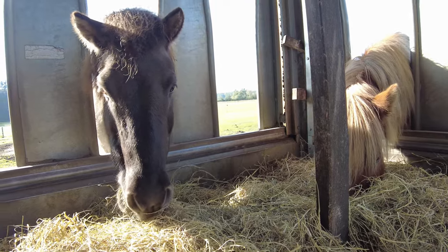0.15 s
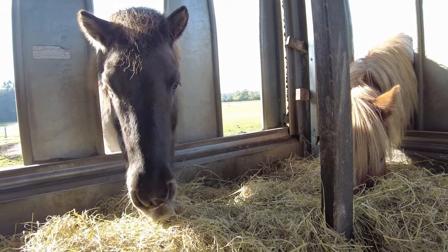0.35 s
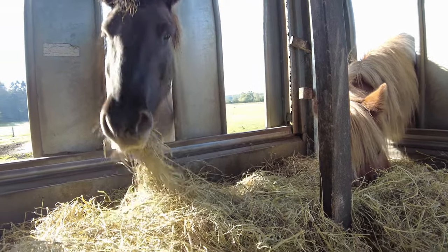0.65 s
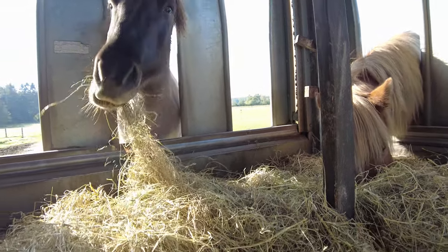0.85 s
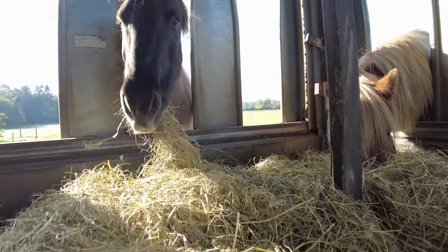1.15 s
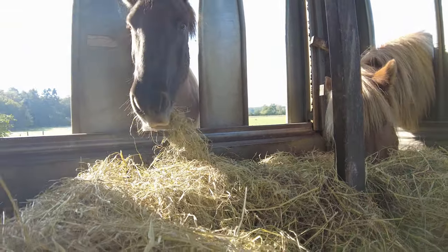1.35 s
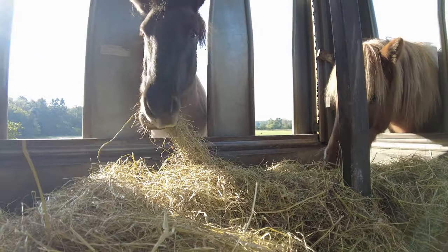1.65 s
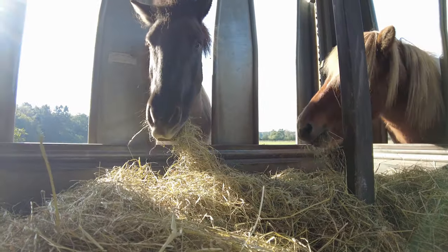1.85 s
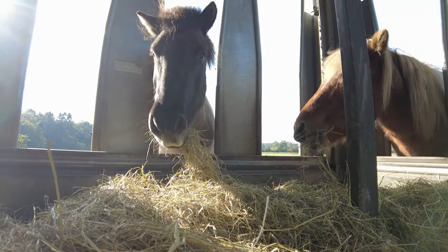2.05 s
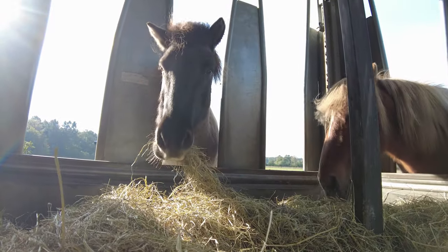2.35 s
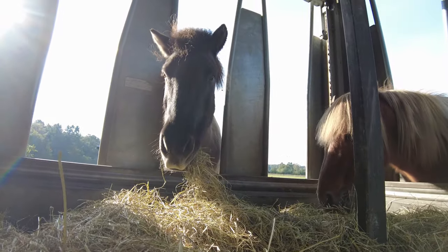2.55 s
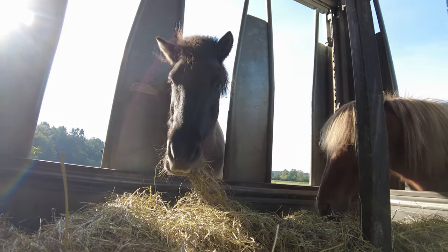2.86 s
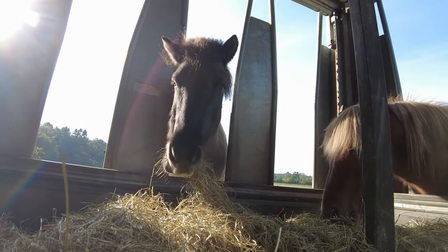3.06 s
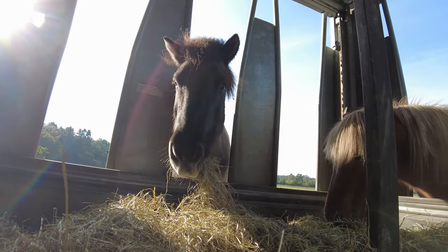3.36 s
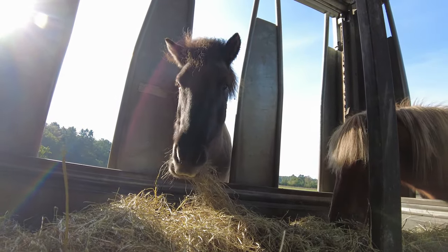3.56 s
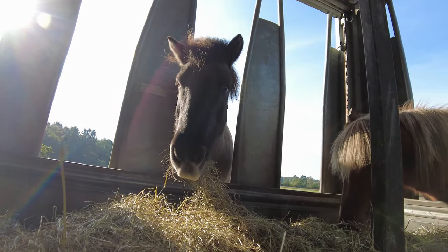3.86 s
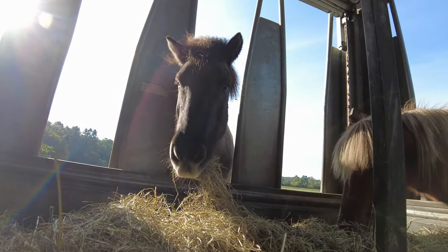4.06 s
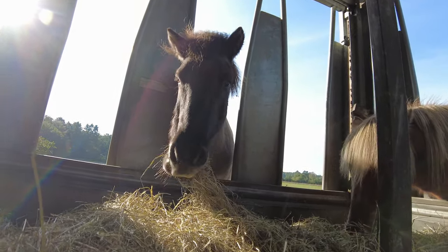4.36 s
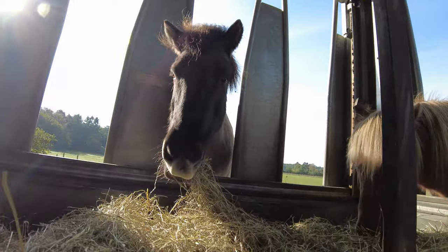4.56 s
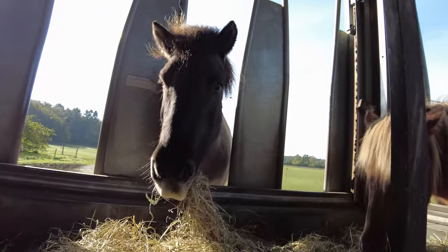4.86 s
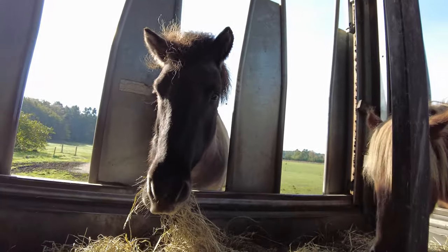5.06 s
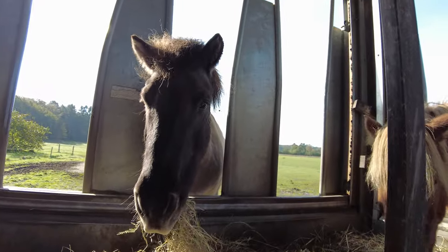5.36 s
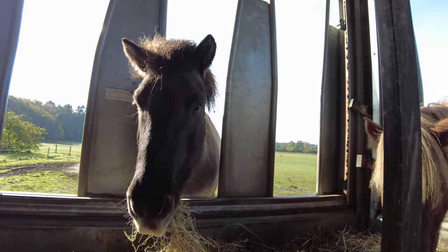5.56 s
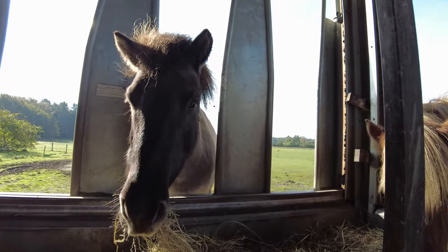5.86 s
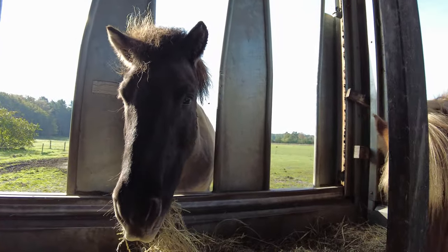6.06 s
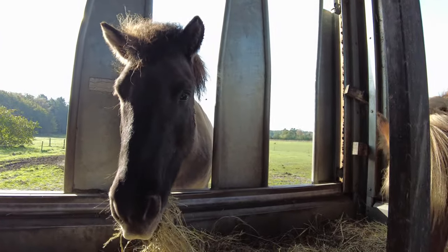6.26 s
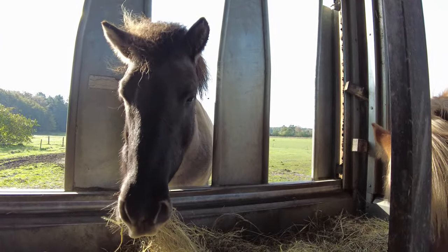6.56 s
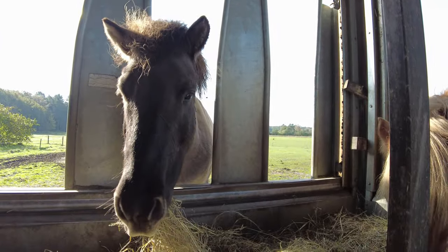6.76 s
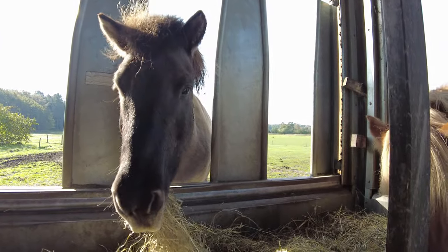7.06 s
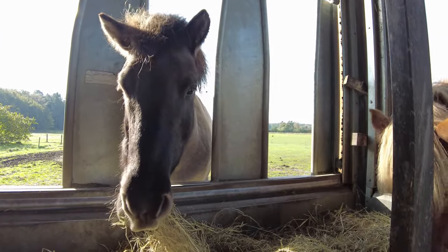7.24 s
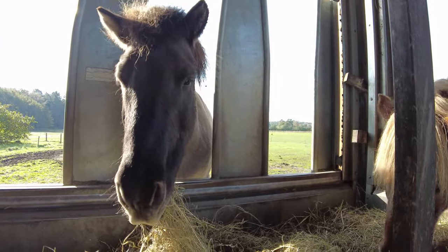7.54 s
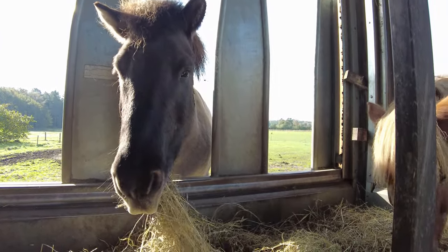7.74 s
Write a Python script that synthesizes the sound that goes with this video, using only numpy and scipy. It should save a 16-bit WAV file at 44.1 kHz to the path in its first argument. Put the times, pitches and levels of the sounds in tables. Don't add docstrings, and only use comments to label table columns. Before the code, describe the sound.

Horses eat dry hay at a feeder in an open field, heard very near in stereo. Heavy jaw strokes give woody, skull-like knocks and gritty grinding, with stalks snapping and small dry ticks on top. Tugged hay rustles most at the start and again late. Faint nose wheezes and low rumbling wind sit underneath. Two thumps stand out, one past halfway and a louder one just before the end.

```python
import sys
import numpy as np
from scipy import signal
from scipy.io import wavfile
from scipy.ndimage import uniform_filter1d

SR = 44100
rng = np.random.default_rng(int(sys.argv[2]) if len(sys.argv) > 2 else 0)


def gain_from_decibels(decibels):
    exponent = np.asarray(decibels, float) / 20
    return 10 ** exponent


def transcribe(signal):
    frames = np.atleast_2d(signal).T
    limited = np.clip(frames, -1, 1)
    pcm = np.round(limited * 32767).astype(np.int16)
    wavfile.write(sys.argv[1], SR, pcm)


N = 348390

# start t/s, length/s, grinding level/dB, crushing level/dB, dry fibre level/dB
CHEW_STROKES = [(.22, 0.31, -34, -46.5, -56), (.93, 0.3, -40.5, -50.5, -59.5),
                (1.63, 0.44, -30.5, -51.5, -75), (2.33, 0.33, -30, -50.5, -63),
                (3.05, 0.29, -30.5, -50, -70), (3.72, 0.28, -30.5, -47.5, -63),
                (4.4, 0.34, -35, -51.5, -68), (5.15, 0.3, -36, -50, -69), (5.86, 0.27, -34, -49, -61),
                (6.63, 0.35, -36.5, -52, -60.5), (7.35, 0.27, -35, -48.5, -63)]
# t/s, peak level/dB, f/Hz
TOOTH_CLACKS = [(0.326, -43, 410), (1.057, -34.5, 410), (1.206, -41, 353), (1.371, -29.5, 408),
                (1.475, -34, 400), (1.633, -32.5, 419), (1.834, -42, 360), (2.087, -32.5, 404),
                (2.488, -33.5, 432), (2.754, -40, 428), (3.497, -31, 413), (3.944, -38, 385),
                (4.212, -34.5, 408), (4.948, -40.5, 538), (6.514, -37, 419), (7.476, -30.5, 420)]
# t/s, level/dB
STEM_CRACKS = [(0.3187, -37), (0.3433, -31), (2.088, -36), (2.3765, -37), (2.5312, -34), (3.4865, -36),
               (4.4332, -40), (4.5190, -44), (4.9509, -19.5), (5.279, -45), (5.327, -27), (5.3815, -32),
               (6.7377, -41), (7.093, -33.5), (7.4293, -39), (7.7398, -45), (7.843, -31.5)]
REST_CRUSH_DB = -58.5


def evened(x):
    return x / np.sqrt(np.mean(x ** 2) + 1e-20)


def read(points, hz):
    f, value = np.transpose(points)
    return np.interp(np.log(hz + 1), np.log(f + 1), value)


def control(table, column):
    rows = np.array(table)
    row_numbers = np.arange(len(rows))
    place = np.interp(np.arange(N) / SR, rows[:, 0], row_numbers)
    eased = place - .1 * np.sin(2 * np.pi * place)
    return gain_from_decibels(np.interp(eased, row_numbers, rows[:, column]))


def add(mix, start_s, sound):
    start = round(start_s * SR)
    sound = sound[max(-start, 0):]
    part = mix[max(start, 0):][:len(sound)]
    part += sound[:len(part)]


def coloured(x, points, size=8192):
    level_db = np.maximum(read(points, abs(np.fft.fftfreq(size, 1 / SR))), -90)
    log_gain = np.log(gain_from_decibels(level_db))
    taps = np.fft.ifft(np.exp(np.conj(signal.hilbert(log_gain)))).real[:size // 2]
    return signal.oaconvolve(x, taps)[:N]


def resonate(x, hz, width_hz):
    turn = np.exp(2j * np.pi * np.cumsum(hz * np.ones(len(x))) / SR)
    r = np.exp(-np.pi * width_hz / SR)
    return 2 * (turn * signal.lfilter([1 - r], [1, -r], x / turn)).real


def lumps(hz, depth_db):
    lowpass = signal.butter(2, hz, fs=SR, output="sos")
    return gain_from_decibels(depth_db * evened(signal.sosfilt(lowpass, rng.standard_normal(N))))


def clicks(per_s, spread_db):
    chance = rng.random(N)
    sign = rng.choice([-1., 1.], N)
    size = np.minimum(rng.exponential(1, N), 4)
    return (chance < per_s / SR) * sign * gain_from_decibels(spread_db * size)


def ring(hz, t60_s, rise_s):
    t = np.arange(0, .15, 1 / SR)
    shape = (1 - np.exp(-t / rise_s)) ** 2 * gain_from_decibels(-60 * t / max(t60_s, .004))
    return shape / shape.max() * np.sin(2 * np.pi * hz * t)


def drifting(x, bins, frames, change, size):
    overlap = size * 3 // 4
    z = signal.stft(x, nperseg=size, noverlap=overlap)[2]
    field = rng.standard_normal(z.shape[::-1] + (2,)).T
    a, b = (evened(uniform_filter1d(uniform_filter1d(f, bins, axis=0), frames, axis=1)) for f in field)
    return signal.istft(z * change(a + 1j * b), nperseg=size, noverlap=overlap)[1][:N]


def strokes(table, column, roundness=1, skew=0.85):
    power = np.zeros(N)
    for row in table:
        start_s, length_s = row[:2]
        u = np.arange(0, 1, 1 / (SR * length_s))
        add(power, start_s, gain_from_decibels(2 * row[column]) * np.sin(np.pi * u ** skew) ** (2 * roundness))
    return power


def jaws(column, rest_db):
    # start t/s, length/s, grinding level/dB, crushing level/dB
    nibble_strokes = [(-.05, 0.096, -41.5, -51), (.12, 0.15, -44.5, -51.5), (.54, 0.094, -39, -56),
                      (.64, 0.49, -44, -73), (1.19, 0.25, -44, -51.5), (1.34, 0.23, -38, -53.5),
                      (2.04, 0.2, -38, -60), (2.7, 0.19, -35, -58), (3.42, 0.26, -37, -60.5),
                      (4.01, 0.091, -40, -58.5), (4.15, 0.2, -35.5, -57), (4.73, 0.25, -45, -61),
                      (4.86, 0.2, -39.5, -49.5), (5.5, 0.25, -39, -50.5), (6.18, 0.11, -40.5, -51),
                      (6.38, 0.49, -47, -57.5), (6.9, 0.2, -43, -56.5), (7.05, 0.15, -43.5, -53),
                      (7.16, 0.2, -39.5, -55.5), (7.59, 0.13, -40, -56), (7.79, 0.089, -44, -48)]
    return np.sqrt(strokes(CHEW_STROKES, column) + strokes(nibble_strokes, column) + gain_from_decibels(2 * rest_db))


def molars():
    # f/Hz, width/Hz, level/dB
    skull_modes = [(215.5, 47, -2), (238, 52.7, 1.5), (265, 125, -4), (283.4, 42.7, 2.5), (352.4, 4.5, -25),
                   (420, 29, -15.5)]
    # t/s, factor on skull pitch [1]
    jaw_tilt = [
        (0, 0.96),
        (1.1, 0.99),
        (1.85, 1.05),
        (3.1, 1.02),
        (4.4, 1.003),
    ]
    # centre t/s, peak level/dB, skull f/Hz, length/ms
    knocks = [(0.329, -15.5, 238, 15.8), (0.347, -15.5, 235, 15), (0.381, -16, 273.5, 21.4),
              (0.428, -17, 271, 8.9), (1.064, -24.5, 261, 22.8), (1.13, -15.5, 250, 24.6),
              (1.717, -23.5, 260, 18), (7.288, -26, 263, 22), (1.826, -17.5, 276, 12.8),
              (1.95, -18.5, 265, 17.8), (2.446, -15.5, 268, 15.4), (2.495, -12.5, 266, 7.9),
              (2.56, -21.5, 285, 18), (3.153, -17, 249, 15.4), (3.197, -17, 283, 12.2),
              (3.847, -19.5, 255, 4.8), (3.893, -13.5, 275, 10.9), (3.946, -17, 250, 8.9),
              (4.45, -22.5, 243, 26), (4.625, -13, 252, 10.7), (4.642, -10.5, 244, 14.9),
              (5.297, -18, 243, 19.9), (5.336, -18.5, 238, 13.3), (5.934, -17.5, 245, 14.1),
              (6.029, -15.5, 245, 14.3), (6.785, -22, 245, 14), (7.439, -19, 255, 13.4),
              (7.493, -15.5, 248, 11), (7.528, -8.5, 237, 15.8), (7.552, -15.5, 231, 11.4)]
    # centre t/s, peak level/dB, skull f/Hz
    soft_slips = [(0.21, -23, 262), (0.574, -31.5, 239), (0.816, -25, 275), (1.23, -24, 231),
                  (1.367, -29, 307), (1.49, -21.5, 288), (1.909, -20.5, 267), (2.103, -25.5, 311),
                  (2.396, -35, 265), (2.746, -28, 238), (2.77, -33, 285), (2.835, -33, 275),
                  (3.253, -20, 268), (3.522, -32, 258), (3.604, -25.5, 218), (3.778, -24, 220),
                  (4.059, -32, 255), (4.227, -22.5, 229), (4.528, -24.5, 232), (4.663, -16.5, 242),
                  (4.931, -19.5, 272), (5.014, -25, 220), (5.598, -26, 249), (5.666, -26, 301),
                  (6.083, -21.5, 225), (6.593, -25.5, 283), (6.695, -22, 250), (6.97, -30, 231),
                  (7.218, -28.5, 251.6), (0.193, -30.5, 268)]
    # t/s, peak level/dB, f/Hz
    thuds = [(0.373, -37, 148), (0.417, -36, 135), (2.541, -30, 112), (3.23, -34, 95), (3.813, -36, 146),
             (3.879, -31, 80), (4.21, -31.5, 92), (6.26, -36, 116), (7.29, -37, 131), (4.629, -23, 129),
             (4.942, -39.5, 104), (5.319, -30.5, 131), (5.903, -33, 133), (6.072, -29, 115),
             (6.783, -33, 105), (6.839, -27, 118), (7.516, -25.5, 107)]

    tilt = np.interp(np.arange(N) / SR, *np.transpose(jaw_tilt))
    skull = 0
    for hz, width_hz, db in skull_modes:
        mode = resonate(clicks(200, spread_db=2.5), hz * tilt, width_hz)
        skull = skull + gain_from_decibels(db) * evened(resonate(mode, hz * tilt, 1.55 * width_hz))
    grinding = gain_from_decibels(-1.5) * jaws(column=2, rest_db=-46) * evened(skull * lumps(52, depth_db=1.0))

    out = np.zeros(N)
    catches = knocks + [row + (14,) for row in soft_slips]
    for (s, db, hz, length_ms), phase in zip(catches, rng.random((len(catches), 1))):
        u = np.arange(0, 4, 1000 / (SR * length_ms))
        swell = (u / 0.66 * np.exp(1 - u / 0.52)) ** 1.66
        tone = np.sin(2 * np.pi * (hz * u * length_ms / 1000 + phase))
        add(out, s - 0.00059 * length_ms, gain_from_decibels(db) * swell * tone)
    catch_power = abs(uniform_filter1d(out ** 2, size=400)) / gain_from_decibels(2 * -30.0)
    out = out + grinding / np.sqrt(1 + catch_power)
    for s, db, hz in thuds:
        add(out, s, gain_from_decibels(db - 5.5) * ring(hz, 0.11, rise_s=0.0044))
    for s, db, hz in TOOTH_CLACKS:
        add(out, s, gain_from_decibels(db - 2.0) * ring(hz, 0.09, rise_s=0.00091))
    return out


def crushing(teeth):
    # f/Hz, level/dB per Hz
    mouth = [(260, -16), (450, 0), (550, -5), (608, -2.5), (771, -3), (908, -5), (1000, -7.5),
             (1100, -13.5), (1260, -8.5), (1680, -12), (2630, -16), (3700, -23.5), (4300, -19),
             (9000, -33.5), (11700, -74), (19800, -120)]
    # t/s, peak level/dB, low ring f/Hz, high ring f/Hz, high ring level/dB
    snaps = [(0.319, -34.5, 740, 2200, -7), (0.374, -39, 638, 2360, -42), (0.399, -32.5, 624, 2000, -32),
             (1.021, -56.5, 620, 3050, 15.5), (2.087, -32, 492, 2570, -23), (2.376, -35, 490, 2150, -21),
             (2.491, -36.5, 770, 2330, -27), (2.53, -42, 610, 2200, -16), (3.185, -32.5, 509, 2460, -11.5),
             (4.201, -43, 1460, 1760, -4), (4.518, -51, 1380, 2600, -9), (4.623, -35, 467, 2600, -8.5),
             (5.213, -42.5, 1450, 1800, -25), (5.327, -31.5, 635, 2580, -15), (5.38, -39, 705, 1810, -18),
             (5.985, -44, 1255, 2470, -10), (6.578, -47, 1265, 2570, -24), (6.737, -41, 730, 2610, -10.5),
             (7.198, -39, 700, 2450, -13), (7.43, -44, 740, 2410, -21), (7.476, -35.5, 650, 3100, -11),
             (7.739, -51, 1472, 1880, 5), (7.828, -45, 1237, 1880, -18)]
    # t/s, level/dB
    cheek = [
        (0, 1.5),
        (2, -4.5),
        (4.2, -26),
        (5.2, 5),
        (7.9, 6),
    ]

    press = jaws(column=3, rest_db=REST_CRUSH_DB)
    cracks = press * clicks(5000, spread_db=3.0) * lumps(105, depth_db=0.6)
    power = teeth ** 2 + 1e-9
    catching = uniform_filter1d(power, size=500) / uniform_filter1d(power, size=4000)
    cracks = cracks * catching ** 0.19
    press_rms = np.sqrt(np.mean(press ** 2))
    clumps = drifting(coloured(cracks, mouth), bins=4, frames=9,
                      change=lambda f: gain_from_decibels(2.34 * f.real), size=256)
    out = gain_from_decibels(-2.0) * press_rms * hush() * evened(clumps)

    blows = np.zeros(N)
    t = np.arange(0, .04, 1 / SR)
    for (s, db, low_hz, high_hz, high_db), grit in zip(snaps, rng.standard_normal((len(snaps), len(t)))):
        splinters = grit * gain_from_decibels(-60 * t / 0.12) * (1 - np.exp(-t / 0.00025))
        add(blows, s, gain_from_decibels(db) * splinters)
        add(out, s, gain_from_decibels(db + high_db + 15.5) * resonate(splinters, high_hz, 210))
        add(out, s, gain_from_decibels(db - 5.5) * ring(low_hz, 0.12, rise_s=0.00008))
    for (s, db, _), grit in zip(TOOTH_CLACKS, rng.standard_normal((len(TOOTH_CLACKS), len(t)))):
        add(blows, s - .012, gain_from_decibels(db - 9.5) * grit * np.hanning(len(t)))
    u = t * 1000 / 0.84
    crack = -np.sin(np.pi * u) * np.exp(-.55 * u) * np.clip(3.2 * u, 0, 1)
    for s, db in STEM_CRACKS:
        add(out, s, gain_from_decibels(db) * crack)
    out = out + gain_from_decibels(5.5) * coloured(blows, mouth)
    return out + control(cheek, column=1) * resonate(out, 1330, 250)


def hush():
    hush_s, depth = 0.0055, 0.48
    gain = np.ones(N)
    dip = depth * np.sin(np.pi / 2 * np.arange(0, 1, 1 / (SR * hush_s)))
    for s, _ in STEM_CRACKS:
        add(gain, s - hush_s, -dip)
    return gain


def fibres():
    # t/s, peak level/dB, ring f/Hz
    ticks = [(0.32, -40, 2300), (0.3985, -47, 2900), (0.4204, -34, 2110), (0.9527, -33, 1920),
             (1.0216, -47, 3120), (2.3765, -39, 2220), (2.4307, -29.5, 2450), (2.4775, -34, 2400),
             (2.8125, -33, 2020), (3.1457, -31, 2340), (3.1911, -46, 2730), (3.8263, -32, 2680),
             (3.8851, -29.5, 2370), (4.5191, -44, 1950), (4.5637, -32, 1920), (4.6229, -39, 2900),
             (4.8638, -34, 1810), (4.949, -32, 1700), (5.3078, -28.5, 1920), (5.327, -32.5, 2800),
             (5.9135, -36, 1720), (5.9843, -25.5, 2470), (6.7835, -34, 1870), (7.492, -45, 1830),
             (7.6235, -32, 1860), (7.7403, -39, 2160)]
    # t/s, peak level/dB, ring f/Hz
    stems = [
        (2.24, -50, 9000),
        (6.72, -48, 12500),
        (2.239, -44.5, 5950),
        (2.31, -54, 7000),
        (2.76, -50, 6200),
        (3.2, -53, 5800),
        (3.345, -53, 10700),
        (4.809, -43, 6000),
        (6.695, -44, 10000),
    ]
    # t/s, peak level/dB, ring f/Hz
    threads = [(0.2713, -37, 2680), (0.3504, -45, 2650), (0.44, -37, 2660), (1.0336, -36, 3030),
               (1.0809, -45, 1980), (1.72, -35, 2880), (1.8986, -36, 2150), (2.5316, -47, 2210),
               (3.248, -42, 2160), (3.788, -41, 2700), (3.807, -32, 2260), (3.834, -28, 2300),
               (4.637, -35, 2590), (4.912, -40, 2440), (4.9831, -33, 2020), (5.9845, -39, 3200),
               (6.6856, -43, 3150), (6.9272, -34, 2400), (7.2779, -33, 2350), (7.443, -37, 2730)]

    fibre_hz, width_hz = 2600, 860
    tearing = clicks(1500, spread_db=5.5) * lumps(64, depth_db=2.5)
    tearing = resonate(tearing, fibre_hz, width_hz)
    tearing = resonate(tearing, fibre_hz, 1.1 * width_hz)
    pull = np.sqrt(strokes(CHEW_STROKES, column=4, roundness=1.8, skew=0.74))
    out = pull * hush() * evened(tearing)
    t = np.arange(0, .03, 1 / SR)
    parting = ticks + stems + threads
    for (s, db, hz), grit in zip(parting, rng.standard_normal((len(parting), len(t)))):
        burst = grit * gain_from_decibels(-60 * t / 0.024) * np.tanh(t / .0015)
        burst = resonate(resonate(burst, hz, 800), hz, 1400)
        add(out, s, gain_from_decibels(db - 8.5) * burst / abs(burst).max())
    return out


def crackle():
    # t/s, peak level/dB, f/Hz
    pips = [(0.082, -49, 1280), (0.2906, -39, 1420), (0.3287, -36.5, 1440), (0.3434, -44, 1280),
            (0.3504, -42, 1280), (0.4414, -41, 1400), (1.079, -42, 1420), (1.1213, -46, 1300),
            (1.2257, -48, 1390), (1.365, -40.5, 1350), (1.432, -46.5, 1530), (1.6305, -46, 1380),
            (1.694, -41.5, 1440), (4.1395, -49, 1400), (4.2168, -43.5, 1467), (4.5188, -49, 1340),
            (4.6224, -43, 1320), (4.637, -40, 1280), (4.6504, -40, 1120), (4.891, -48, 1510),
            (4.9167, -41.5, 1460), (4.9512, -42, 1340), (5.2769, -43.5, 1430), (5.307, -43, 1300),
            (4.937, -39, 1530), (5.966, -51, 1250), (5.9825, -35, 1294), (6.0236, -50, 1266),
            (5.38, -45, 1340), (6.7745, -42, 1343), (7.0932, -41, 1310), (7.1127, -48, 1280),
            (7.1374, -43, 1330), (7.198, -41, 1480), (7.4899, -41, 1305), (7.518, -39, 1270),
            (7.7388, -40, 1290), (7.811, -44, 1430)]
    # t/s, peak level/dB, f/Hz
    pops = [(0.292, -48, 710), (0.333, -38, 677), (2.416, -43, 533), (2.799, -46.5, 850), (3.099, -47, 804),
            (3.246, -44, 773), (3.486, -48, 550), (3.766, -50, 616), (3.812, -39.5, 528),
            (4.433, -44.5, 656), (4.932, -44, 633), (5.283, -42, 689), (5.356, -39, 700), (5.914, -41, 646),
            (5.971, -39, 633), (5.983, -38, 640), (6.501, -48, 770), (6.686, -47.5, 580), (6.917, -47, 726),
            (7.43, -47, 645), (7.448, -47, 790), (7.62, -46, 790)]
    # t/s, peak level/dB, skull f/Hz
    small_catches = [(0.254, -32.5, 266), (0.296, -31, 260), (0.403, -26, 274), (0.775, -33, 282),
                     (0.953, -29, 259.4), (1.034, -25, 269.3), (1.083, -23, 255.5), (1.627, -41, 280),
                     (1.693, -32, 304), (1.768, -28, 283.4), (1.978, -36, 247), (2.368, -33.5, 275),
                     (2.477, -23.5, 257.6), (2.529, -33, 301), (2.659, -35.5, 250), (3.829, -35, 238),
                     (4.55, -27, 237), (4.59, -29.5, 269), (4.758, -33, 288.5), (4.826, -33, 235),
                     (4.984, -29, 279), (5.23, -27, 235.4), (5.378, -33, 227), (5.536, -38, 261.1),
                     (6.289, -33.5, 270.4), (6.328, -34, 282), (6.749, -30.5, 218), (7.619, -30.5, 238)]

    out = np.zeros(N)
    kinds = ((pips, -.5, .03, .002), (pops, -1.0, .075, .003), (small_catches, -1.5, .13, .005))
    for table, shift_db, t60_s, rise_s in kinds:
        grits = uniform_filter1d(rng.standard_normal((len(table), 6615)), size=12, axis=1)
        for (s, db, hz), grit in zip(table, grits):
            rough = 1 + 0.98 * hz / 1000 * grit
            add(out, s, gain_from_decibels(db + shift_db) * ring(hz, t60_s, rise_s) * rough)
    splinters = resonate(resonate(clicks(700, spread_db=2.5), 1450, 1800), 1900, 2600)
    press = jaws(column=3, rest_db=REST_CRUSH_DB - 5.0)
    out = out + gain_from_decibels(-10.5) * press * hush() * evened(splinters)
    return signal.sosfilt(signal.butter(2, 5500, fs=SR, output="sos"), out)


def rustle():
    # t/s, rustle level/dB
    heap = [(.3, -68), (.53, -60.5), (.74, -58), (.98, -65.5), (1.34, -67), (1.62, -58), (2.2, -68.5),
            (3.1, -71.5), (3.72, -74), (4.07, -67), (4.39, -70.5), (5.72, -67.5), (6.1, -67), (6.53, -62.5),
            (6.95, -66.5), (7.22, -64), (7.78, -62), (7.9, -66)]
    # start t/s, length/s, rustle level/dB
    tugs = [(.55, 0.45, -56), (1.03, 0.29, -59.5), (1.5, 0.4, -70), (3.05, 0.27, -64), (3.3, 0.11, -65),
            (3.5, 0.16, -64), (3.78, .17, -65), (4.0, 0.13, -65.5), (4.5, 0.25, -62), (4.98, 0.19, -63.5),
            (5.55, 0.3, -66), (5.88, .1, -66), (7.12, 0.31, -59.5)]
    # f/Hz, level/dB per Hz
    hay = [(590, -22), (1000, -7), (1370, -8.5), (1680, -1), (1980, -9), (3170, -6), (7800, -11.5),
           (13300, -18), (15800, -20.5)]

    stems = clicks(9000, spread_db=-1.5) * lumps(24, depth_db=0.6)
    shake = np.tanh(jaws(column=3, rest_db=REST_CRUSH_DB) / gain_from_decibels(REST_CRUSH_DB + 10.0)) ** 0.081
    stirred = gain_from_decibels(5.0) * control(heap, column=1) * shake
    pulled = np.sqrt(stirred ** 2 + strokes(tugs, column=2, roundness=0.97))
    return pulled * evened(coloured(stems, hay))


def nostrils():
    wheezes = [(1.99, 2.09, 4900, 3600, -63.5), (2.95, 3.07, 2960, 3700, -65), (4.87, 5.0, 3400, 3600, -62),
               (7.35, 7.46, 4300, 2860, -60), (1.19, 1.33, 1700, 1650, -54.5), (0.98, 1.4, 2700, 3100, -60),
               (5.76, 5.96, 3570, 3900, -62), (5.76, 5.92, 2800, 3100, -61.5),
               (2.8, 2.85, 1400, 1500, -56.5), (.575, .605, 1200, 870, -49.5),
               (1.015, 1.05, 2800, 2900, -61)]
    out = np.zeros(N)
    for start_s, end_s, from_hz, to_hz, db in wheezes:
        hz = np.linspace(from_hz, to_hz, round((end_s - start_s) * SR))
        breath = rng.standard_normal(SR)[:len(hz)]
        breath = resonate(resonate(breath, hz, 520), hz, 710)
        add(out, start_s, gain_from_decibels(db) * evened(breath) * signal.windows.tukey(len(hz), .6))
    return out


def outdoors():
    # t/s, level/dB
    gusts = [(0.0, -46), (0.09, -48.5), (0.59, -40), (0.72, -47), (1.21, -43), (1.63, -44), (1.65, -50),
             (1.82, -41), (2.07, -49), (3.8, -45.5), (4.6, -48.5), (4.64, -36), (4.69, -48.5), (6.8, -49),
             (6.86, -47), (7.41, -53), (7.55, -49), (7.9, -55)]
    # f/Hz, level/dB per Hz
    wind_spectrum = [(12, -45), (20, 9), (49, 12), (96, -0.5), (124, -3.5), (156, -7.5), (175, -28),
                     (230, -8.5), (390, -120)]
    # f/Hz, level/dB per Hz
    air_spectrum = [(59, -2.5), (100, -11), (156, -30.5), (219, -2), (265, -1.5), (511, -17.5), (796, -22),
                    (1090, -43), (1300, -21.5), (2250, -34), (3150, -27.5), (12800, -53), (15800, -51)]
    wind = control(gusts, column=1) * evened(coloured(rng.standard_normal(N), wind_spectrum))
    air = evened(coloured(rng.standard_normal(N), air_spectrum))
    return gain_from_decibels(0.5) * wind + gain_from_decibels(-51.5) * air


def panels(x):
    # f/Hz, side over mid level/dB
    side_width = [(60, -18), (150, -19.5), (250, -8), (400, -3.5), (700, -0.5), (1000, 6.5), (1300, -5.5),
                  (2400, -1.5), (4400, 0.5), (6000, -2.5), (7800, -2), (9500, -2), (15000, -1.5)]
    width = gain_from_decibels(read(side_width, np.fft.rfftfreq(512, 1 / SR)))[:, None]
    return drifting(x, bins=5, frames=6, size=512,
                    change=lambda f: width * (.9j * f.imag + 0.082 * f.real))


def scene():
    teeth = molars()
    mouths = teeth + crushing(teeth)
    soft_top = signal.butter(2, 7000, fs=SR, output="sos")
    background = rustle() + nostrils() + outdoors()
    mid = signal.sosfilt(soft_top, mouths) + background + fibres() + crackle()
    left_lean = gain_from_decibels(-14.0) * resonate(resonate(mid, 850, 700), 1000, 900)
    side = panels(mid) + left_lean
    return np.array([mid + side, mid - side])


def band_limit(x):
    return signal.sosfilt(signal.butter(12, 15760, fs=SR, output="sos"), x)


def record(dry):
    return band_limit(dry)


dry = scene()
out = record(dry)
transcribe(out)
```